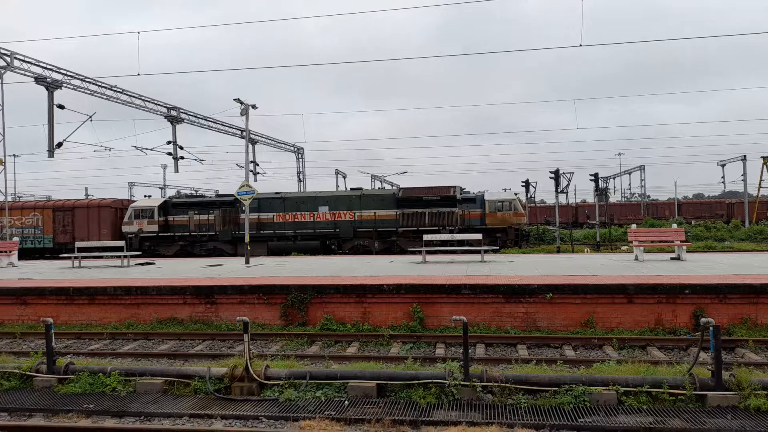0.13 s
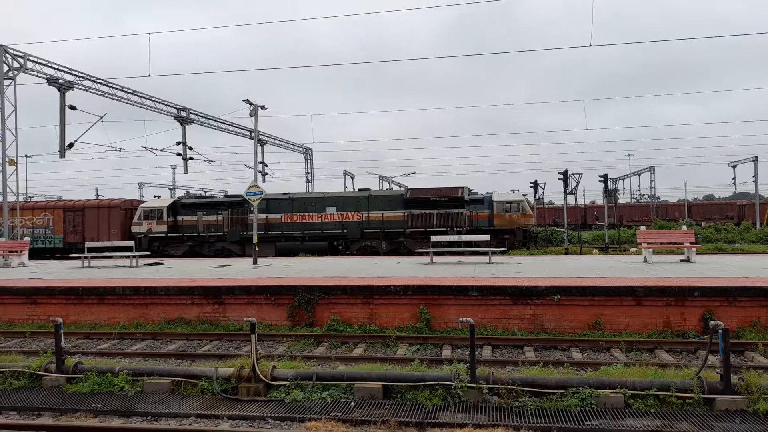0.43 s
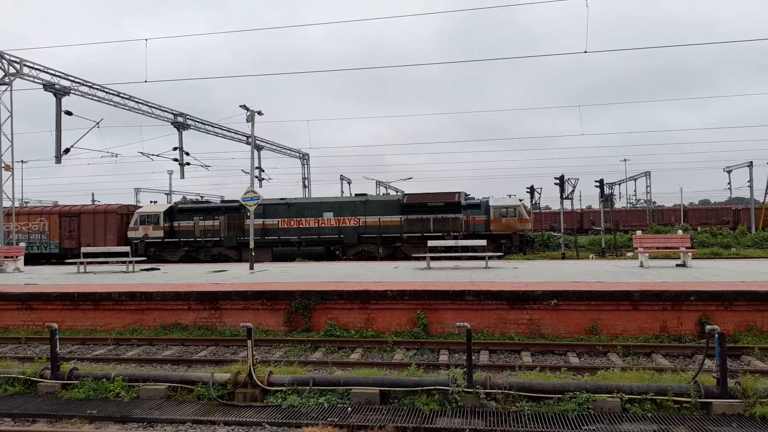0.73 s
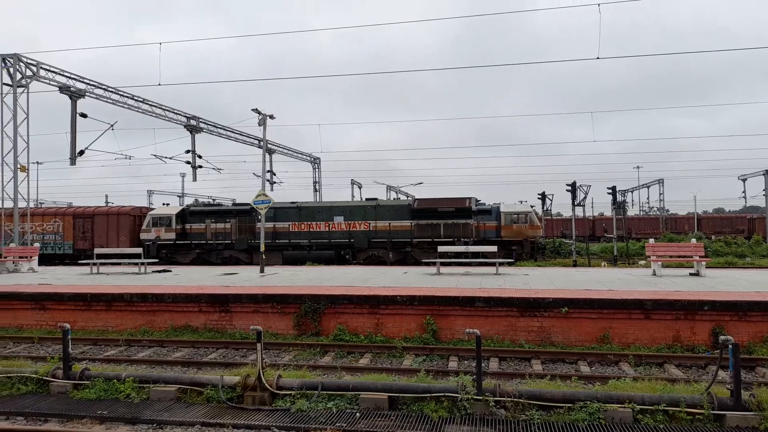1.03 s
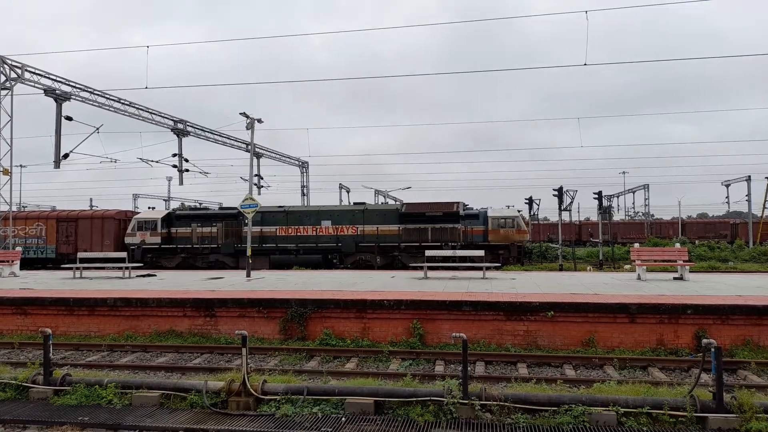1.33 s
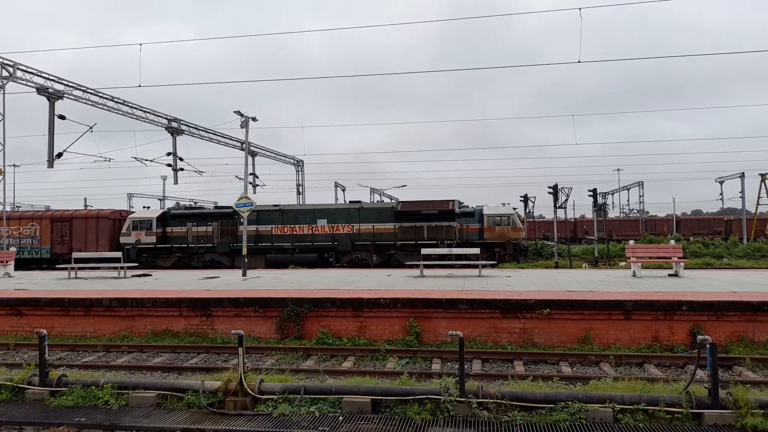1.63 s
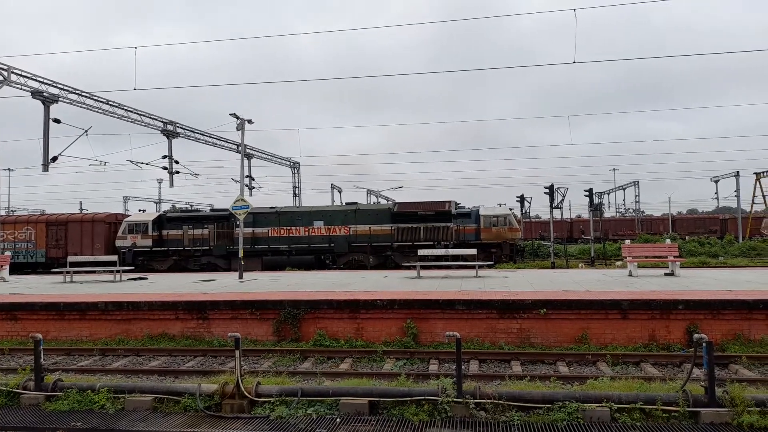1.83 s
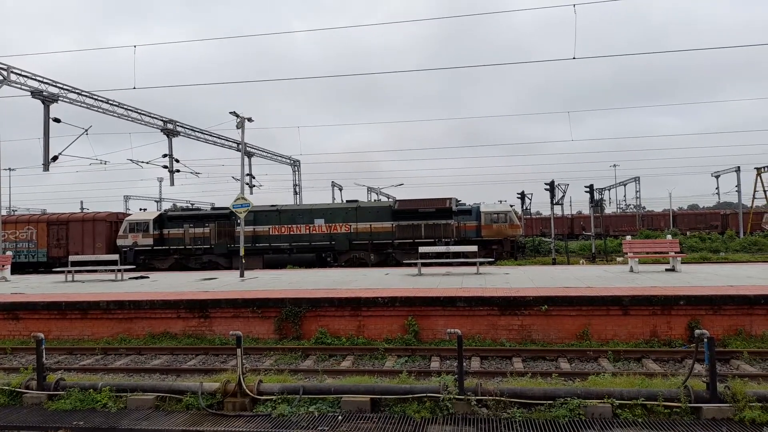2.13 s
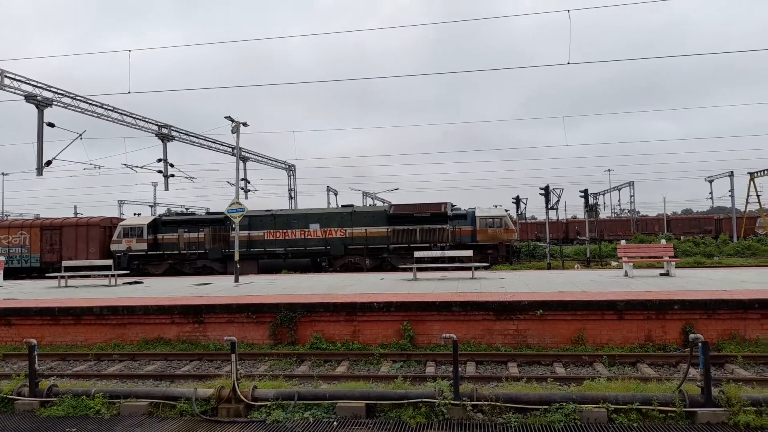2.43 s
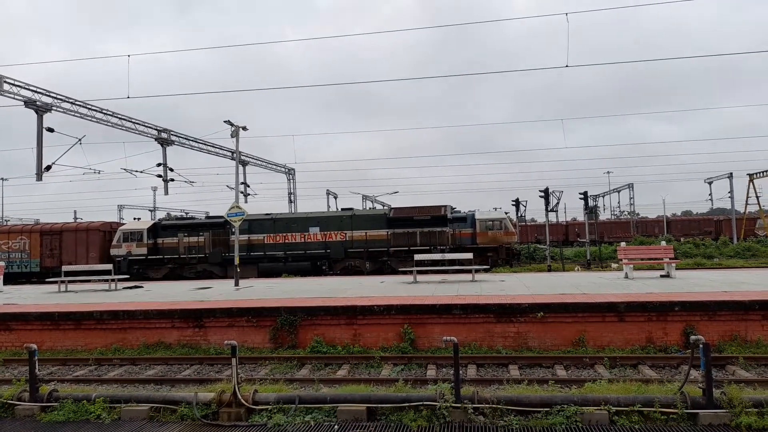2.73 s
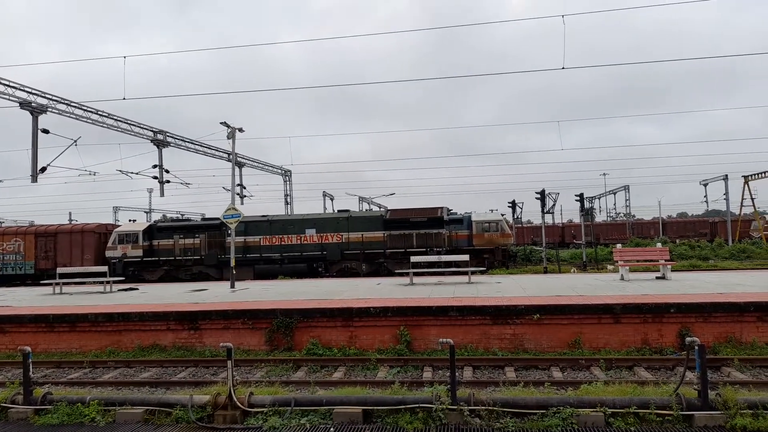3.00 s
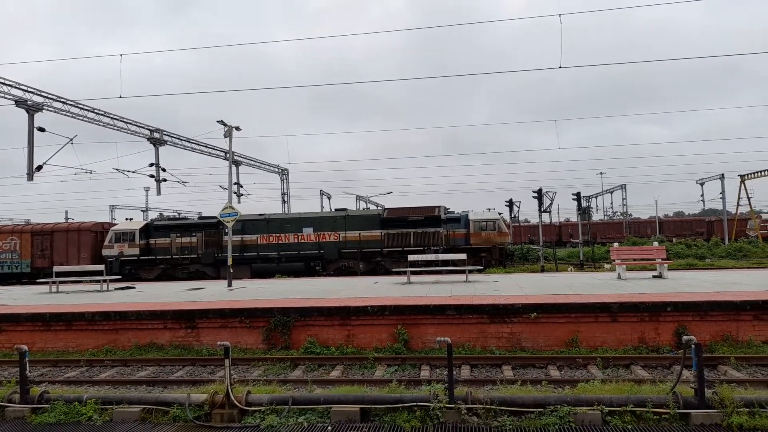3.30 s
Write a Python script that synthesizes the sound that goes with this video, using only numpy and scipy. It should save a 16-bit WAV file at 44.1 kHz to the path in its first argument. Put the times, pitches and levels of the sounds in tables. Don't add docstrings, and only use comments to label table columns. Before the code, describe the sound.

A diesel locomotive idles with a deep, throbbing hum, steady roar and thin high whine

```python
import sys
import numpy as np
from scipy import signal
from scipy.fft import rfft, irfft
from scipy.io import wavfile
from scipy.ndimage import uniform_filter1d

SR = 44100
rng = np.random.default_rng(int(sys.argv[2]) if len(sys.argv) > 2 else 0)


def voltage_ratio(decibels):
    exponent = np.asarray(decibels, float) / 20
    return 10 ** exponent


def int16_out(signal):
    q = np.round(np.clip(np.atleast_2d(signal).T, -1, 1) * 32767)
    wavfile.write(sys.argv[1], SR, q.astype(np.int16))


N = 152586

SHAFT_HZ, TWIN_HZ = 6.091, 5.988

# (shaft order, level [dB rms])
BARK = [(36, -52), (37, -52), (38, -54), (39, -42), (40, -39), (41, -39), (42, -43), (43, -41), (44, -52),
        (45, -62)]
# (shaft order, level [dB rms])
RASP = [(21, -44), (23, -45), (27, -45), (29, -47), (32, -47), (33, -44), (48, -48), (65, -45), (67, -49),
        (68, -42), (79, -49), (103, -48), (105, -49), (107, -46), (110, -48), (111, -50), (114, -44),
        (116, -44), (118, -48), (119, -47), (122, -44), (123, -49), (128, -51), (131, -50), (133, -50),
        (135, -50), (237, -41), (238, -51)]
# (shaft order, level [dB rms])
CRANK = [(15, -45), (16, -46), (17, -48), (19, -49), (20, -47), (25, -49), (26, -48), (28, -48), (30, -52),
         (31, -51)]


def evened(x):
    return x / np.sqrt(np.mean(abs(x) ** 2) + 1e-20)


def read(points, hz):
    f, value = np.transpose(points)
    return np.interp(np.log(hz + 1), np.log(f + 1), value)


def add(mix, s, sound):
    part = mix[round(s * SR):][:len(sound)]
    part += sound[:len(part)]


def drift(width_hz):
    z = rng.standard_normal((2, N + SR))
    r = np.exp(-np.pi * width_hz / SR)
    once = signal.lfilter([1 - r], [1, -r], z[0] + 1j * z[1])
    twice = signal.lfilter([1 - r * r], [1, -r * r], once)
    return evened(twice[SR:])


def ports(x, apart=None):
    # (frequency [Hz], likeness [0-1])
    likeness = [(60, 0.87), (100, 0.45), (180, 0.84), (300, 0.8), (700, 0.7), (1400, 0.74), (3000, 0.081),
                (6000, 0.67), (9000, 0.17), (15000, 0.25)]
    # (frequency [Hz], phase [rad])
    lead = [(0, 0), (1460, 1.755), (3450, 4.5), (5400, 5), (10800, 8.5), (15800, 13.5)]
    # (frequency [Hz], left minus right [dB])
    tilt = [(60, -1.6), (130, 1), (500, -2.5), (1400, -0.5), (2800, 4.5), (5400, 0.5), (8100, 14.5),
            (11000, 2.5), (15000, 3)]
    hz = np.fft.rfftfreq(N, 1 / SR)
    left = rfft(x)
    right = left
    if apart is not None:
        same = np.clip(read(likeness, hz), 0, 1)
        right = same * left + np.sqrt(1 - same ** 2) * rfft(apart)
    f, rad = np.transpose(lead)
    half = voltage_ratio(read(tilt, hz) / 2) * np.exp(.5j * np.interp(hz, f, rad))
    return irfft(np.array([left * half, right / half]), N)


def orders(shaft_hz, rows, at_s=None):
    k, db = np.transpose(rows)
    turns = rng.random(len(k)) if at_s is None else k * shaft_hz * at_s
    z = np.zeros(8193, complex)
    z[k.astype(int)] = 8192 * np.sqrt(2) * voltage_ratio(db) * np.exp(-2j * np.pi * turns)
    place = np.arange(N) / SR * shaft_hz % 1
    return np.interp(place, np.arange(16384) / 16384, irfft(z), period=1)


def exhaust():
    # (shaft order, level [dB rms])
    thump = [(6, -50), (7, -44), (8, -28), (9, -31), (10, -33), (11, -52), (12, -47), (13, -36), (14, -50)]
    # (shaft order, level [dB rms])
    twin = [(6, -62), (7, -54), (8, -36), (9, -39), (10, -57), (11, -64), (12, -46), (13, -43), (14, -64)]
    thump_s, twin_s, bark_s = .0515, .1245, .1407
    kick_s, twin_kick_s = .0904, .0658
    low = orders(SHAFT_HZ, thump[:6] + thump[8:], thump_s)
    low += orders(TWIN_HZ, twin[:6] + twin[8:], twin_s)
    low += orders(SHAFT_HZ, BARK[3:9], bark_s)
    kick = orders(SHAFT_HZ, thump[6:8], kick_s)
    kick += orders(TWIN_HZ, twin[6:8], twin_kick_s)
    return voltage_ratio(-0.76) * low + kick


def fan():
    fan_hz, fan_s, fan_db = 259.1, 3.2601, -46
    t = np.arange(N) / SR
    return np.sqrt(2) * voltage_ratio(fan_db) * np.cos(2 * np.pi * fan_hz * (t - fan_s))


def block_and_pipe():
    pipe_s = .074
    block = orders(SHAFT_HZ, CRANK + RASP[:7] + RASP[10:-2])
    block *= 1 + 0.071 * drift(9.3).real
    return voltage_ratio(-1.03) * block + orders(SHAFT_HZ, RASP[7:10], pipe_s)


def gears():
    swell_s, waver = .12, .2
    pair = orders(SHAFT_HZ, RASP[-2:], swell_s)
    return voltage_ratio(4.0) * pair * (1 + waver * drift(28).real)


def uneven_rasp():
    # (frequency [Hz], level [dB rms])
    comb = [(85, -45), (200, -64.5), (330, -56), (450, -59.5), (560, -59), (700, -53.5), (900, -57),
            (1100, -72.5), (1260, -72), (1350, -56), (1430, -67)]
    uneven_db = 4
    named = {k for k, db in BARK + RASP + CRANK}
    rest = []
    for k in range(15, 236):
        if k not in named:
            rest.append((k, read(comb, k * SHAFT_HZ) + uneven_db * rng.standard_normal()))
    loose = BARK[:3] + BARK[9:] + rest
    rasp = voltage_ratio(-2.12) * orders(SHAFT_HZ, loose) * (1 + 0.082 * drift(44).real)
    echo = orders(SHAFT_HZ, loose)
    twin_rasp = voltage_ratio(-6.5) * orders(TWIN_HZ, rest)
    return ports(rasp + twin_rasp, echo)


def engines():
    return ports(exhaust() + fan() + block_and_pipe() + gears()) + uneven_rasp()


def turbo():
    # (time [s], level [dB])
    effort = [(.15, -40.5), (.5, -54), (.76, -37), (1.0, -39), (1.1, -52), (1.2, -40), (1.45, -35.5),
              (1.65, -38.5), (1.8, -55), (2.0, -48), (2.3, -44), (2.5, -64), (2.85, -43), (3.1, -56),
              (3.3, -41.5), (3.45, -48.5)]
    s, db = np.transpose(effort)
    return voltage_ratio(np.interp(np.arange(N) / SR, s, db - db.mean()))


def whines():
    pitches = [672, 1120, 1343.8, 2956, 3144, 3456, 5346, 5382, 5397, 10794]
    # (level [dB rms], halo width [Hz], steady share [0-1], throb [0-1], share of turbo effort)
    voices = [(-38, 12, 0.02, 0.07, 0), (-61, 3.6, 0.3, 0, 0.049), (-47, 12, 0.75, 0.05, 0),
              (-48, 7.5, 0.79, 0, 0.11), (-56, 16, 0.3, 0, 0), (-43.5, 23, 0.83, 0, 0.011),
              (-48, 22, 0.05, 0.4, 0.57), (-43, 15.4, 0.75, 0.01, 0.45), (-43, 20.5, 0.75, 0, 0.28),
              (-62, 130, 0, 0.04, 0.063)]
    # (time [s], lower tone [dB], upper tone [dB])
    load = [(.12, 7, 2.5), (.5, 4.5, 0), (.7, -8, -1), (1.1, -10, -2.5), (1.3, -3, 1.5), (1.85, -1, 1.5),
            (2.0, -12, 1), (2.4, 4, -2.5), (2.6, 3, 0), (2.75, 0, -6), (2.85, 3, 1.5), (3.1, 1, -8),
            (3.33, -7, 3.5), (3.45, 5, -4)]
    # (lower [Hz], upper [Hz])
    load_hz = (2956, 3456)
    t = np.arange(N) / SR
    out = np.zeros((2, N))
    effort = turbo()
    for hz, (db, width_hz, steady, throb, share) in zip(pitches, voices):
        steady = np.clip(steady, 0, 1)
        tone = np.exp(2j * np.pi * hz * t) * effort ** share
        tone *= 1 + throb * np.cos(4 * np.pi * SHAFT_HZ * (t - .04))
        if hz in load_hz:
            sway = np.array(load)
            tone *= voltage_ratio(np.interp(t, sway[:, 0], sway[:, load_hz.index(hz) + 1]))
        core = steady * np.exp(2j * np.pi * rng.random())
        for side in out:
            halo = np.sqrt(1 - steady ** 2) * drift(width_hz)
            side += np.sqrt(2) * voltage_ratio(db) * (tone * (core + halo)).real
    return ports(*out)


def air(gain, patchy_db, swell_db):
    frames = N // 256 + 5
    a, b, c, d, patches = rng.standard_normal((frames, 513, 5)).T
    patches = uniform_filter1d(patches, size=12, axis=0)
    patches = evened(uniform_filter1d(patches, size=12, axis=1))
    swell = drift(1.0).real[np.minimum(np.arange(frames) * 256, N - 1)]
    z = np.array([a + 1j * b, c + 1j * d]) * voltage_ratio(patchy_db * patches + swell_db * swell)
    white = signal.istft(z, nperseg=1024, noverlap=768)[1][:, :N]
    return evened(irfft(rfft(white) * gain, N))


def roar():
    # (frequency [Hz], width [Hz], level [dB rms])
    hood = [(248, 30, -50), (413, 19, -56), (738, 284, -37.5), (1345, 44, -43), (2780, 540, -48.5),
            (5325, 240, -46.5)]
    # (frequency [Hz], level [dB per Hz])
    low_colour = [(30, -7), (45, -1), (70, 3), (190, -2.5), (260, -1), (340, -3), (500, -9.5), (800, -6.5),
                  (1300, -24)]
    # (frequency [Hz], level [dB per Hz])
    high_colour = [(590, -25), (1000, -15.5), (1410, -5.5), (1610, -8.5), (3400, -13.5), (4590, -16.5),
                   (5400, -14), (6270, -30), (15800, -44)]
    low_db, high_db = -30.5, -36
    hz = np.fft.rfftfreq(N, 1 / SR)
    humps = sum(voltage_ratio(2 * db) / w / (1 + (2 * (hz - f) / w) ** 2) ** 2 for f, w, db in hood)
    hump_rms = np.sqrt(humps.mean() * SR / 2 * 4 / np.pi)
    low = voltage_ratio(read([(10, -60)] + low_colour + [(2000, -70)], hz))
    high = voltage_ratio(read([(500, -39)] + high_colour, hz))
    noise = voltage_ratio(low_db) * air(low, 0.4, 0.51)
    noise += voltage_ratio(high_db) * air(high, 0.84, 1.0)
    noise += hump_rms * air(np.sqrt(humps), 0.62, 0.32)
    return ports(*noise)


def air_puffs():
    # (start [s], length [s], level [dB rms])
    bursts = [
        (0.09, 0.15, -50),
        (0.66, .04, -47),
        (1.513, 0.11, -44.5),
        (2.27, .05, -52),
        (2.318, 0.077, -50),
        (2.91, 0.055, -50),
        (3.36, 0.11, -51),
    ]
    # (frequency [Hz], level [dB per Hz])
    colour = [(3000, 1), (5500, 5.5), (8500, -5), (10000, -4.5), (13000, -8), (15800, -12)]
    level = np.zeros(N)
    for s, length, db in bursts:
        add(level, s, voltage_ratio(db) * np.hanning(round(length * SR)) ** 0.5)
    gain = voltage_ratio(read([(1500, -60)] + colour, np.fft.rfftfreq(N, 1 / SR)))
    return ports(*(level * air(gain, 1.5, .1)))


def metal_ticks():
    # (time [s], peak level [dB], frequency [Hz])
    knocks = [
        (.6745, -48, 7000),
        (.9775, -43, 7600),
        (1.048, -38, 7450),
        (1.0485, -50, 13500),
        (1.2391, -34, 13500),
    ]
    out = np.zeros(N)
    t = np.arange(200) / SR
    shape = np.minimum(t / .0002, 1) * np.exp(-t / 0.00036)
    for s, db, hz in knocks:
        add(out, s, voltage_ratio(db + 6) * np.sin(2 * np.pi * hz * t) * shape)
    return ports(out)


def birds():
    # (start [s], length [s], level [dB rms], start pitch [Hz], end pitch
    # [Hz])
    coos = [
        (.09, .135, -37, 522, 485),
        (3.29, .17, -46, 516, 521),
        (.115, .055, -51, 1800, 1790),
        (2.9, .09, -52, 2170, 2180),
        (.13, .16, -42, 680, 662),
    ]
    # (level [dB rms], hoarseness width [Hz])
    caw = (-42.5, 140)
    # (start [s], length [s])
    caw_time = (3.16, .18)
    # (start pitch [Hz], end pitch [Hz])
    caw_glide = (2200, 2030)
    out = np.zeros(N)
    for s, length, db, from_hz, to_hz in coos:
        n = round(length * SR)
        voice = np.sin(2 * np.pi * np.cumsum(np.linspace(from_hz, to_hz, n)) / SR)
        add(out, s, voltage_ratio(db + 10.5) * np.hanning(n) ** .5 * voice)
    s, length = caw_time
    db, width_hz = caw
    n = round(length * SR)
    glide = np.exp(2j * np.pi * np.cumsum(np.linspace(*caw_glide, n)) / SR)
    add(out, s, voltage_ratio(db + 5.5) * np.hanning(n) * (glide * drift(width_hz)[:n]).real)
    return np.array([voltage_ratio(-1.5) * np.roll(out, shift=6), voltage_ratio(4.0) * out])


def scene():
    return engines() + whines() + roar() + air_puffs() + metal_ticks() + birds()


def band_limit(x):
    return signal.sosfilt(signal.butter(12, 16020, fs=SR, output="sos"), x)


def record(dry):
    # (frequency [Hz], level [dB])
    mic = [(20, -12), (32, -25), (42, 1), (8900, 0), (9600, -1), (10300, -3), (11500, 3.5)]
    on_s, open_s, edge_hz = .1058, 0.00052, 15780
    hz = np.fft.rfftfreq(N, 1 / SR)
    coloured = irfft(rfft(dry) * voltage_ratio(read(mic, hz)), N)
    switched = coloured * np.clip((np.arange(N) / SR - on_s) / open_s + 0.48, 0, 1)
    edge = signal.firwin(1023, edge_hz, window=("kaiser", 8), fs=SR)
    mix = signal.oaconvolve(switched, edge[None], "same")
    return band_limit(mix)


dry = scene()
out = record(dry)
int16_out(out)
```